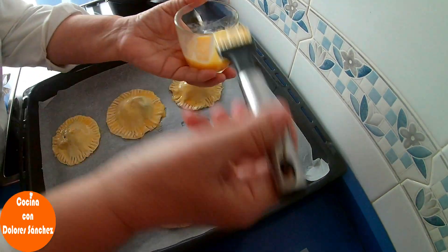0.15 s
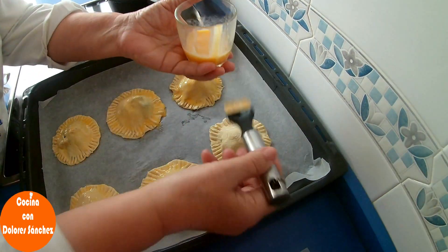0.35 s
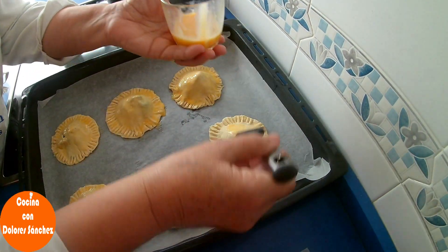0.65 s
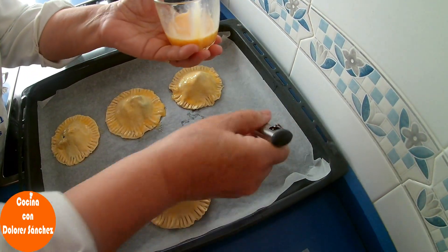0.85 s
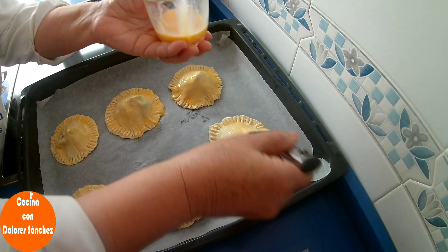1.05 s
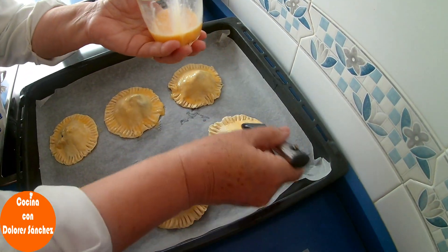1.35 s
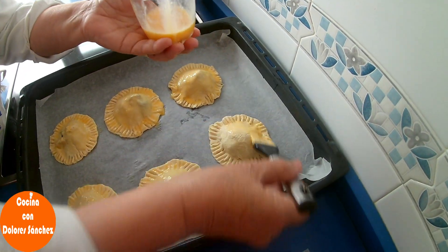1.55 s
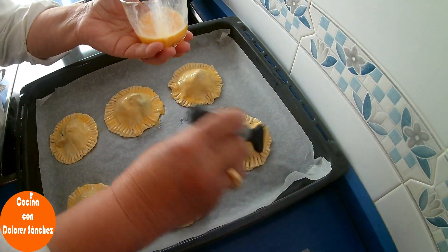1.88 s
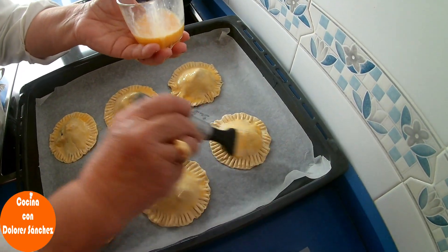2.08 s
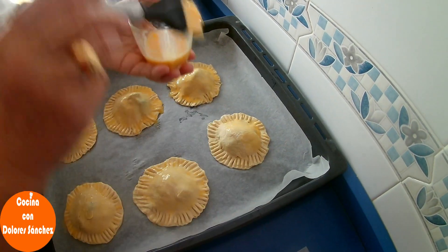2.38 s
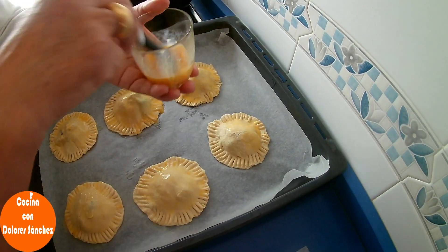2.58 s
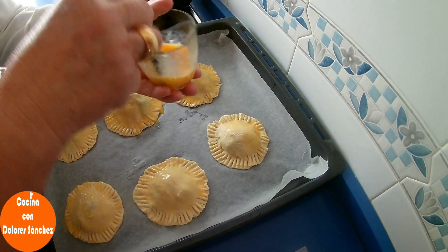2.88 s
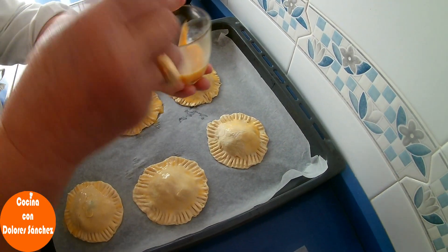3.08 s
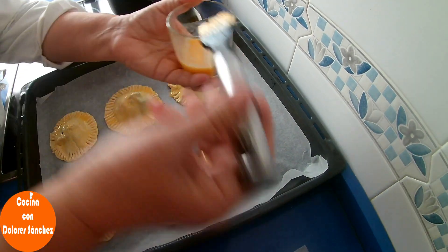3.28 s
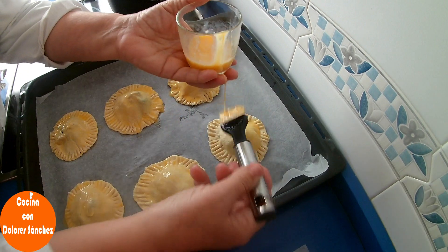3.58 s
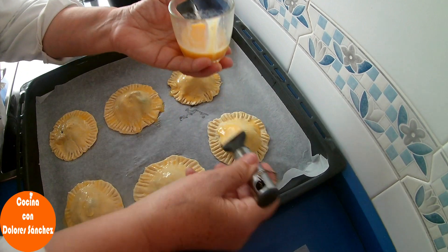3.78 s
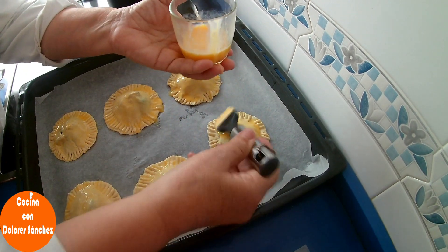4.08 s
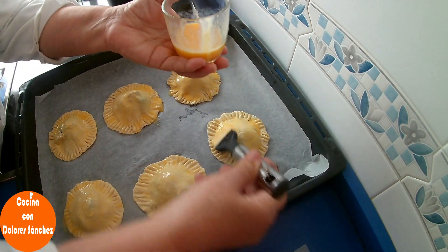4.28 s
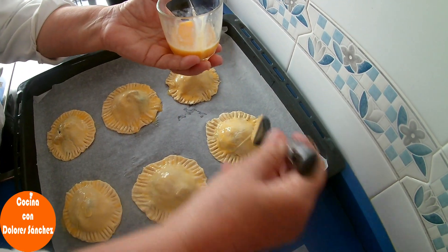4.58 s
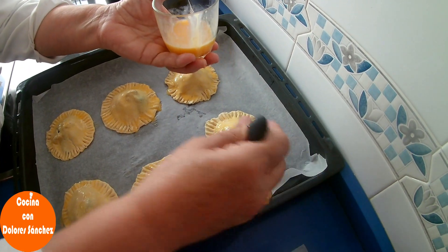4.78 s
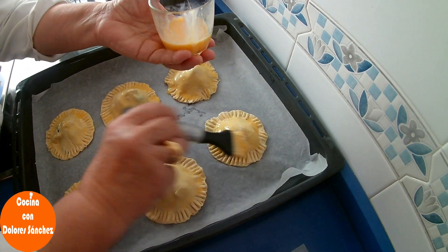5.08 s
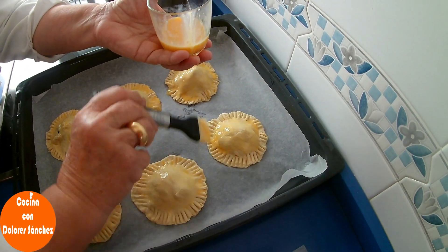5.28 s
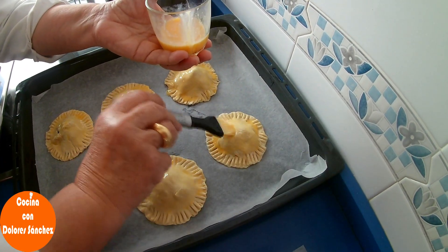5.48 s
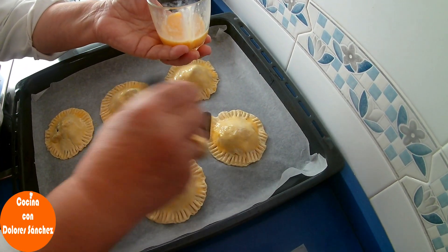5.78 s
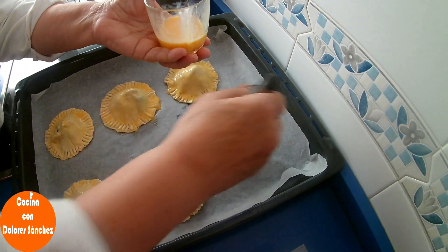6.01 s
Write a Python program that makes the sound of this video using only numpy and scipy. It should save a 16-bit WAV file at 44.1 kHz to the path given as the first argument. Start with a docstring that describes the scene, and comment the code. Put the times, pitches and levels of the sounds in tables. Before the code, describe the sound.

Quiet room rumble and hiss surround faint, wet bristle strokes heard close up. An opening wipe squeaks on a small glass; a low hoot and falling bird chirps are barely audible. Damped glass taps follow near the middle, then a scrape and creak end in one loud hollow clack with a short rattle and bright, tiled-room echo. Light brushing and ticks resume to the end.

```python
"""Pastry brush, small hand-held glass and paper-lined tray in a tiled kitchen, over quiet rumble and hiss.
From the start bristle noise strokes egg over pastry; the brush wipes and squeaks on the glass rim (modes
rubbed by noise). A low hoot, ticks and bird chirps (gliding tones, noise bursts) come in, and return later.
From 2.7 s taps ring the glass modes; from 3.4 s something hollow creaks, slides, knocks and rattles.
Strokes, ticks, another hoot and a chirp follow to the end."""
import sys
import numpy as np
from scipy import signal
from scipy.fft import rfft, irfft
from scipy.io import wavfile
from scipy.ndimage import uniform_filter1d

SR = 44100
rng = np.random.default_rng(int(sys.argv[2]) if len(sys.argv) > 2 else 0)


def to_wav(sig):
    """Store sig (one row per channel, or 1-D mono) as 16-bit WAV at the path in sys.argv[1].

    Samples outside -1..1 are clipped; the rate is SR.
    """
    pcm = np.clip(np.atleast_2d(sig), -1, 1) * 32767
    pcm = np.round(pcm).astype(np.int16)
    wavfile.write(sys.argv[1], SR, pcm.T)  # frames by channels


N = 271149


def amp(db):
    """Decibels to amplitude."""
    return 10 ** (np.asarray(db) / 20)


def unit(x):
    """Scales to an RMS of 1."""
    return x / np.sqrt(np.mean(x ** 2) + 1e-20)


def read(points, hz):
    """Reads a (frequency, value) curve at hz, linear in log frequency."""
    f, value = np.transpose(points)
    return np.interp(np.log(hz + 1), np.log(f + 1), value)


def shaped(x, points):
    """Filters x by a spectrum in dB."""
    return irfft(rfft(x) * amp(read(points, np.fft.rfftfreq(N, 1 / SR))), N)


def columns(rows):
    """Start time and every other column, interpolated to one value a sample."""
    start_s, *rest = np.transpose(rows)
    t = np.arange(start_s[0], min(start_s[-1], (N - 2) / SR), 1 / SR)
    return start_s[0], [np.interp(t, start_s, c) for c in rest]


def add(mix, start_s, sound):
    """Adds sound into mix at start_s, cut at the end of mix."""
    part = mix[max(round(start_s * SR), 0):][:len(sound)]
    part += sound[:len(part)]


def resonate(x, hz, width_hz):
    """Resonance on a moving pitch: shifts the curve hz down to zero, smooths, shifts back."""
    turn = np.exp(2j * np.pi * np.cumsum(hz) / SR)
    r = np.exp(-np.pi * width_hz / SR)
    return 2 * (turn * signal.lfilter([1 - r], [1, -r], x / turn)).real


def ring(modes, tilt_db):
    """One blow: every mode starts from rest and decays; neighbours swing in opposite directions."""
    hz, db, t60_s = np.transpose(modes)[:, :, None]
    t = np.arange(SR // 2) / SR
    sign = (-1) ** np.arange(len(modes))[:, None]
    decay_db = db + tilt_db * np.log2(hz / 2000) - 60 * t / t60_s
    out = (sign * amp(decay_db) * np.sin(2 * np.pi * hz * t)).sum(0)
    return out / abs(out).max()


def rub(modes, tilt_db, pitch_ratio, blur_hz):
    """Uneven slips keep the modes murmuring; friction broadens them, the high ones most."""
    n = len(tilt_db)
    slips = rng.standard_normal(n) * (2.0 + 2.8 * (rng.random(n) < 300 / SR))
    body = 0
    for hz, db, _ in modes:
        centre_hz = np.full(n, hz * pitch_ratio)
        width_hz = blur_hz * (hz / 1000) ** 1.47
        mode = resonate(resonate(slips, centre_hz, width_hz), centre_hz, 3 * width_hz)
        body = body + amp(db + tilt_db * np.log2(hz / 1000)) * unit(mode)
    return body / np.sqrt(uniform_filter1d(body ** 2, 600) + 1e-20)  # evens out the level


def glides(calls, width_hz, clear, throb_per_s=0, throb_db=0):
    """Gliding, blurred tones: part sine (share clear), part narrow noise."""
    out = np.zeros(N)
    for start_s, length_s, first_db, last_db, first_hz, last_hz in calls:
        t = np.arange(0, length_s, 1 / SR)
        hz = first_hz + (last_hz - first_hz) * t / length_s
        db = first_db + (last_db - first_db) * t / length_s
        db = db + throb_db * np.sin(2 * np.pi * throb_per_s * t)
        noise = rng.standard_normal(len(hz))
        fuzz = unit(resonate(resonate(noise, hz, width_hz), hz, width_hz))
        tone = np.sqrt(2) * np.sin(2 * np.pi * np.cumsum(hz) / SR)
        blend = unit(clear * tone + (1 - clear) * fuzz)
        add(out, start_s, amp(db) * blend * signal.windows.tukey(len(hz), .15))
    return out


# room noise spectrum: (frequency [Hz], relative density [dB per Hz])
ROOM_SPECTRUM = [(12, -15.5), (20, -30), (49, 4), (145, -4.5), (285, -9.5), (335, -10.5), (394, -11.5),
                 (938, -15), (1020, -17.5), (3840, -29), (5170, -28.5), (9140, -34), (10200, -31.5),
                 (11700, -34.5), (13000, -28)]
# soft low swells in the rumble: (time [s], rise before low-band weighting [dB])
RUMBLE_SWELLS = [(.53, 2.5), (1.34, 1.5), (2.02, 3), (3.191, 8), (3.46, 10.5), (4.7, 7.5), (5.72, 8.5)]
ROOM_DB, DRIFT_RMS_DB, SWELL_S = -61.5, 1.5, 0.039  # drift also before low-band weighting


def room_tone():
    """Steady patchy noise whose low end drifts and now and then swells."""
    frames, hz = N // 256 + 5, np.fft.rfftfreq(1024, 1 / SR)
    a, b, patches = rng.standard_normal((frames, 513, 3)).T
    patches = unit(uniform_filter1d(uniform_filter1d(patches, 10, 0), 12, 1))
    t = np.arange(frames) * 256 / SR
    drift_db = DRIFT_RMS_DB * unit(uniform_filter1d(rng.standard_normal(frames), size=14))
    drift_db = drift_db + sum(db * np.exp(-((t - s) / SWELL_S) ** 2) for s, db in RUMBLE_SWELLS)
    low_share = 1 / (1 + (hz / 450) ** 4) / (1 + (70 / (hz + 1)) ** 4)
    level_db = read(ROOM_SPECTRUM, hz)[:, None] + 0.66 * patches + np.outer(low_share, drift_db)
    noise = signal.istft((a + 1j * b) * amp(level_db), nperseg=1024, noverlap=768)[1][:N]
    return amp(ROOM_DB) * unit(noise)


# brush strokes: (full pressure at [s], lean-in [s], held [s], hiss level [dB], tray rustle level [dB])
BRUSH_STROKES = [(.0, .001, 0.066, -86, -54), (.16, 0.099, .4, -74.5, -67), (.62, 0.16, 0.038, -68, -66.5),
                 (.99, 0.083, 0.069, -67.5, -69.5), (1.09, .03, 0.089, -73, -74.5),
                 (1.33, 0.065, 0.067, -75, -75.5), (1.435, .01, .25, -67.5, -66.5),
                 (2.01, .015, .015, -67, -69), (2.094, 0.026, 0.053, -63.5, -69),
                 (2.61, 0.083, 0.055, -73, -73), (2.924, 0.0084, 0.0089, -71.5, -64.5),
                 (3.21, 0.066, 0.11, -72, -68.5), (3.41, .01, .01, -70, -67),
                 (3.87, 0.027, 0.024, -65, -70), (4.04, 0.088, 0.026, -75.5, -81),
                 (4.194, 0.013, 0.0054, -66.5, -62.5), (4.398, 0.026, 0.089, -61, -68),
                 (4.776, 0.0067, 0.014, -62.5, -65), (4.86, 0.14, .2, -80, -72.5),
                 (5.244, 0.12, 0.027, -67, -71), (5.56, .05, 0.1, -85, -76), (5.89, .02, 0.026, -82, -65),
                 (5.97, .03, 0.049, -67.5, -60)]
# bristle hiss spectrum: (frequency [Hz], relative density [dB per Hz])
BRISTLE_SPECTRUM = [(900, -14), (1600, -10), (2500, -1), (3500, -7.5), (4300, -2), (5600, 1.5),
                    (7000, -3.5), (9000, -8), (10600, -0.5), (12000, -7.5), (13500, -4.5)]
# tray rustle spectrum: (frequency [Hz], relative density [dB per Hz])
TRAY_SPECTRUM = [(500, -3), (800, 1), (1200, 0.5), (1700, -6), (2500, -12.5), (4000, -27.5)]
LEAN_DB, LIFT_DB_PER_S = -16.5, -320  # level one lean-in time before full pressure, fade on lifting


def strokes():
    """Countless bristle slips of uneven size: a bright hiss, and a duller rustle through the tray."""
    fine = rng.standard_normal((2, N))
    size = rng.exponential(1, (2, N))
    hit = rng.random((2, N)) < 900 / SR
    slips = fine * (1 + 2.15 * amp(3.7 * np.minimum(size, 5)) * hit)
    t, power = np.arange(N) / SR, np.zeros((2, N))
    for full_s, lean_s, held_s, hiss_db, rustle_db in BRUSH_STROKES:
        lean_in_db = LEAN_DB * np.maximum(full_s - t, 0) / abs(lean_s)
        lift_db = LIFT_DB_PER_S * np.maximum(t - full_s - held_s, 0)
        shape_db = np.maximum(lean_in_db + lift_db, -80)
        power += amp([[hiss_db], [rustle_db]] + shape_db) ** 2
    hiss, rustle = np.sqrt(power)
    bright = hiss * unit(shaped(slips[0], BRISTLE_SPECTRUM))
    return bright + rustle * unit(shaped(slips[1], TRAY_SPECTRUM))


# brush wiped over the rim: (time [s], level [dB])
RIM_WIPE = [(0, -38.5), (.012, -48), (.029, -41.5), (.04, -57), (.055, -45.5), (.08, -49.5), (.11, -59),
            (.2, -77), (.24, -84)]
# bristles squeak on the rim:
# (start [s], length [s], first level [dB], last level [dB], first pitch [Hz], last pitch [Hz])
RIM_SQUEAK = [(.025, .05, -48, -56, 2255, 2560)]
# brush on the glass:
# (time [s], blow level [dB], brightness [dB per octave], rise [s], time until bristles damp the ring [s])
GLASS_TAPS = [(2.680, -37, 6, 0.00029, 0.013), (2.690, -35, 1, 0.013, 0.023), (2.953, -51, 1, .001, 0.0088),
              (2.972, -57.5, -3, 0.0042, 0.014), (3.2665, -37, -4, 0.0002, 0.0085),
              (3.284, -42, 6, 0.006, 0.022)]
# glass modes: (frequency [Hz], relative level before tilt [dB], t60 [s])
GLASS_MODES = [(1087, -13, 0.09), (1261, -9.5, 0.075), (2127, 5, 0.202), (2180, -21, 0.18),
               (2280, -9, 0.044), (2540, -16.5, 0.082), (3760, -25.5, 0.062), (5113, -12.5, 0.057),
               (5184, -27.5, 0.71), (6000, -30.5, 0.075), (9400, -32, 0.19), (9560, -50, 0.11)]


def glass():
    """Wipe rubs the modes, bristles squeak; each tap rings the glass until wet bristles lean on it."""
    out, t = np.zeros(N), np.arange(SR // 2) / SR
    for start_s, db, tilt_db, rise_s, free_s in GLASS_TAPS:
        damping_db = -15 * np.clip((t - free_s) / .01, 0, 1)
        rise = np.minimum(t / rise_s, 1)
        add(out, start_s, amp(db + damping_db) * rise * ring(GLASS_MODES, tilt_db))
    start_s, (db,) = columns(RIM_WIPE)
    add(out, start_s, amp(db) * rub(GLASS_MODES, np.full(len(db), -2.5), pitch_ratio=1.012, blur_hz=15.3))
    return out + glides(RIM_SQUEAK, width_hz=140.0, clear=0.43)


# low hoots:
# (start [s], length [s], first level [dB], last level [dB], first pitch [Hz], last pitch [Hz])
LOW_HOOTS = [(.12, .38, -67.5, -64, 569, 588), (4.8, 0.28, -70, -68, 572, 584)]


def hoots():
    """Faint low tones that rise slightly and throb."""
    return glides(LOW_HOOTS, width_hz=64.0, clear=0.23, throb_per_s=7.55, throb_db=1.5)


# single ticks and dull bumps of bristles, paper, tray and sticky egg:
# (time [s], level [dB], pitch [Hz], t60 [s])
SMALL_TICKS = [(.205, -62, 10800, .01), (.621, -55, 1590, 0.016), (.94, -62.5, 4800, 0.022),
               (.981, -57, 5530, 0.036), (1.019, -53, 1270, .02), (1.379, -54, 890, .027),
               (1.433, -52.5, 1120, 0.036), (1.435, -51.5, 4040, 0.024), (1.539, -51.5, 950, 0.021),
               (1.595, -54.5, 1230, 0.071), (1.647, -55, 970, 0.064), (1.664, -61.5, 1380, 0.17),
               (2.01, -55.5, 5000, 0.029), (2.649, -54.5, 2650, 0.023), (2.67, -53, 900, .01),
               (2.68, -49, 9700, 0.017), (2.681, -49.5, 5000, .012), (2.729, -44, 970, 0.014),
               (2.923, -57, 10100, .01), (3.185, -55, 400, .06), (3.258, -56.5, 10530, 0.066),
               (3.266, -47, 4480, 0.015), (3.426, -52, 5450, 0.021), (3.47, -54.5, 900, 0.024),
               (3.529, -43, 800, 0.048), (3.63, -35.5, 335, .08), (4.195, -57.5, 4920, .03),
               (4.777, -52.5, 10840, 0.017), (4.791, -54.5, 5500, .025), (5.70, -51.5, 740, 0.24),
               (5.712, -61.5, 1780, 0.089), (5.735, -57, 760, 0.26), (5.95, -62, 10000, .025),
               (5.97, -58, 5500, 0.019), (6.009, -59, 5500, 0.04)]
TICK_SPREAD, TICK_WIDEST_HZ = 0.59, 2000  # width as a share of pitch, and its limit


def ticks():
    """A short burst: part broad snap, part noise near one pitch."""
    out, t = np.zeros(N), np.arange(6000) / SR
    for start_s, db, hz, t60_s in SMALL_TICKS:
        width_hz = min(TICK_SPREAD * hz, TICK_WIDEST_HZ)
        snap, pitch_hz = rng.standard_normal(len(t)), np.full(len(t), hz)
        pitched = unit(resonate(resonate(snap, pitch_hz, width_hz), pitch_hz, 2 * width_hz))
        burst = 0.13 * snap + pitched
        add(out, start_s, amp(db - 60 * t / t60_s) * burst * np.minimum(t / 0.00017, 1))
    return out


# bird outside:
# (start [s], length [s], first level [dB], last level [dB], first pitch [Hz], last pitch [Hz])
BIRD_CHIRPS = [(.335, .25, -63, -77, 4120, 3690), (1.45, 0.2, -67, -73.5, 4250, 3670),
               (5.5, .09, -82, -80, 4900, 3700)]


def bird():
    """Falling chirps, mostly narrow noise."""
    return glides(BIRD_CHIRPS, width_hz=480., clear=0.089)


# creaks while sliding:
# (start [s], length [s], first level [dB], last level [dB], first pitch [Hz], last pitch [Hz])
SLIDE_CREAKS = [(3.43, 0.015, -54.5, -80, 990, 990), (3.465, 0.052, -58, -63, 1000, 1060),
                (3.53, 0.099, -49.5, -69, 913, 850), (3.45, .08, -72, -57, 670, 700),
                (3.53, 0.093, -59.5, -50.5, 684, 603), (3.555, .065, -58, -59.5, 2010, 2130)]
# grinds up to the knock, then rattles, rocks once more and settles: (time [s], level [dB])
SLIDE_LEVEL = [(3.46, -71), (3.535, -62.5), (3.624, -55), (3.629, -28), (3.72, -53), (3.745, -44.5),
               (3.765, -41), (3.80, -61), (3.95, -77)]
# hollow knocks: (time [s], blow level [dB], brightness [dB per octave])
HOLLOW_KNOCKS = [(3.6264, -13.5, 3), (3.6344, -17, 0.5), (3.648, -23, 2)]
# hollow modes: (frequency [Hz], relative level before tilt [dB], t60 [s])
HOLLOW_MODES = [(401, -15, 0.24), (425, -13, 0.13), (612, -6, 0.064), (712.5, -5, 0.065),
                (775, -3.5, 0.044), (820.5, 0, 0.07), (883, -1.5, 0.038), (948, -4.5, 0.07),
                (1025, -7, 0.062), (1350, -2, 0.082), (1440, 0, 0.032), (1577, -5.5, 0.04),
                (1740, -4.5, 0.017), (2030, -7, 0.043), (2178, -4.5, .025), (2454, -10.5, 0.021),
                (2744, -11.5, 0.033), (3475, -15, 0.019), (3740, -17, 0.033), (4300, -20.5, 0.0138),
                (5090, -11.5, 0.013), (5830, -16.5, 0.0096), (6640, -21, 0.016), (7300, -23.5, 0.0066),
                (9760, -27.5, .01), (10900, -37.5, .01)]
GRIND_TILT_DB, RATTLE_TILT_DB = 2.5, -5  # per octave, before and after the first knock


def hollow():
    """Each knock is a quick clatter of contacts; grinding and rattling rub the modes above 500 Hz."""
    out, t = np.zeros(N), np.arange(900) / SR
    for start_s, db, tilt_db in HOLLOW_KNOCKS:
        contacts = rng.standard_normal(len(t)) * amp(-60 * t / 0.022) * np.minimum(t / 0.00069, 1)
        blow = signal.fftconvolve(contacts, ring(HOLLOW_MODES, tilt_db))
        add(out, start_s, amp(db) * blow / abs(blow).max())
    start_s, (db,) = columns(SLIDE_LEVEL)
    before_knock = start_s + np.arange(len(db)) / SR < HOLLOW_KNOCKS[0][0]
    tilt_db = np.where(before_knock, GRIND_TILT_DB, RATTLE_TILT_DB)
    rubbed = [mode for mode in HOLLOW_MODES if mode[0] > 500]
    add(out, start_s, amp(db) * rub(rubbed, tilt_db, pitch_ratio=1, blur_hz=110.))
    bass_cut = signal.butter(2, 200, "high", fs=SR, output="sos")  # too small to radiate bass
    return signal.sosfilt(bass_cut, out) + glides(SLIDE_CREAKS, width_hz=220.0, clear=0.0565)


# tiled kitchen reverberation: (frequency [Hz], t60 [s])
KITCHEN_T60 = [(200, 0.081), (700, 0.34), (2000, 0.43), (5000, 0.33), (12000, 0.16)]


def kitchen(x):
    """Sparse reflections of random sign, each band dying at its own speed."""
    taps = np.zeros(SR)
    at = np.arange(150, SR - 20, 20)
    taps[at + rng.integers(0, 20, len(at))] = rng.choice([-1., 1.], len(at))
    hz, t, z = signal.stft(taps, SR, nperseg=256)
    decay = amp(-60 * t / read(KITCHEN_T60, hz)[:, None])
    tail = signal.istft(z * decay, SR, nperseg=256)[1]
    return signal.fftconvolve(x, tail / np.linalg.norm(tail))[:N]


# close sound and kitchen echo, narrow dip where a reflection cancels: (frequency [Hz], gain [dB])
NEAR_RESPONSE = [(60, 0), (7300, .5), (7800, -3), (8200, -10.5), (8600, 3), (9000, 0)]


def scene():
    """Close sounds and echo through the near response; direct bird, hoots and room tone added after."""
    cup, knocks, small, chirps = glass(), hollow(), ticks(), bird()
    wet = kitchen(amp(-14) * cup + amp(-10.5) * knocks + amp(-8.0) * small + amp(0.5) * chirps)
    near = shaped(cup + knocks + small + wet + strokes(), NEAR_RESPONSE)
    return (near + chirps + hoots() + room_tone())[None]


# microphone treble roll-off: (frequency [Hz], gain [dB])
MICROPHONE_RESPONSE = [(60, 0), (11900, 0), (12300, -14), (13500, -20)]
EDGE_HZ = 13300


def record(dry):
    """The microphone's treble roll-off, then the band limit."""
    band_limit = signal.firwin(511, EDGE_HZ, window=("kaiser", 9), fs=SR)
    return signal.oaconvolve(shaped(dry, MICROPHONE_RESPONSE), band_limit[None], "same")


dry = scene()
out = record(dry)
to_wav(out)
```